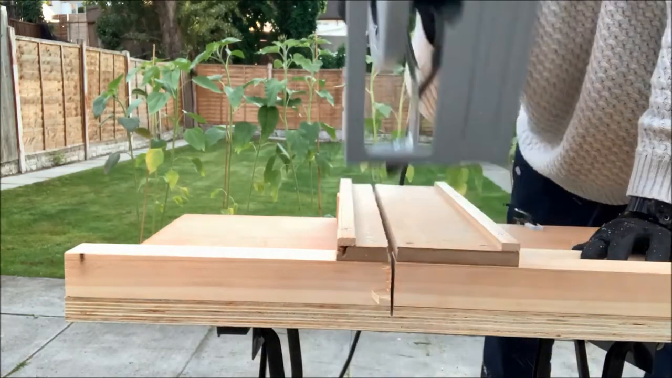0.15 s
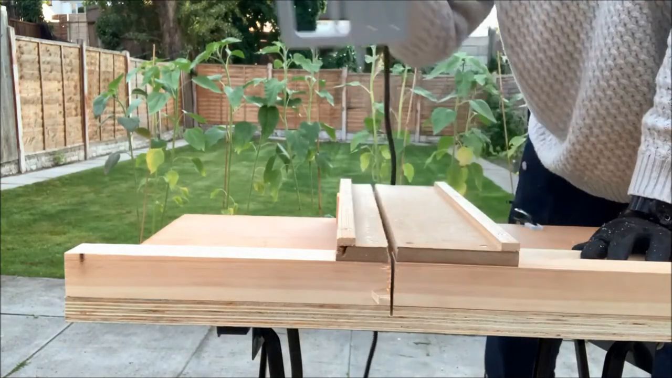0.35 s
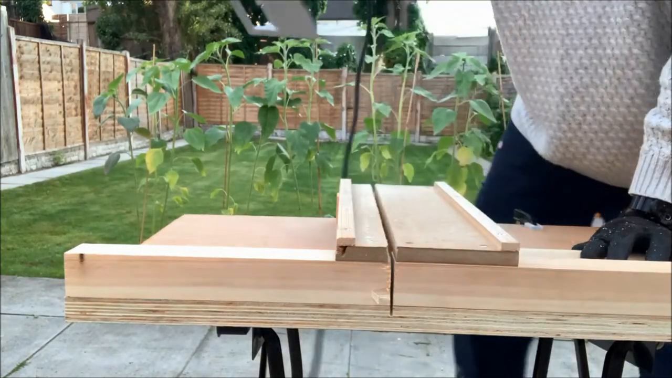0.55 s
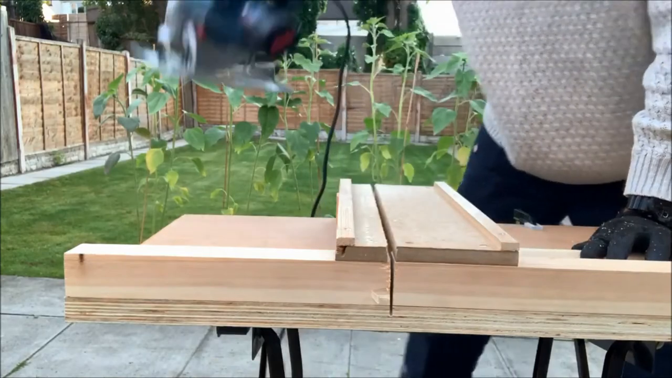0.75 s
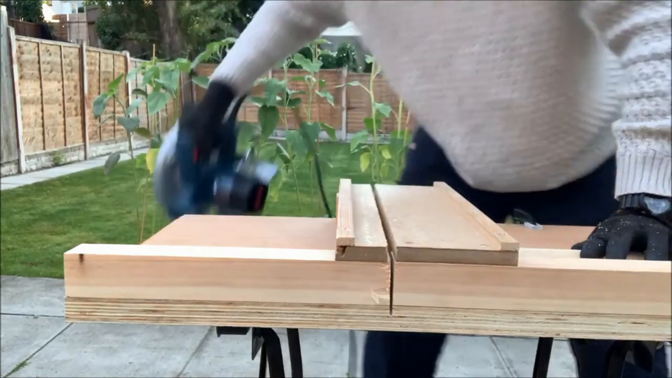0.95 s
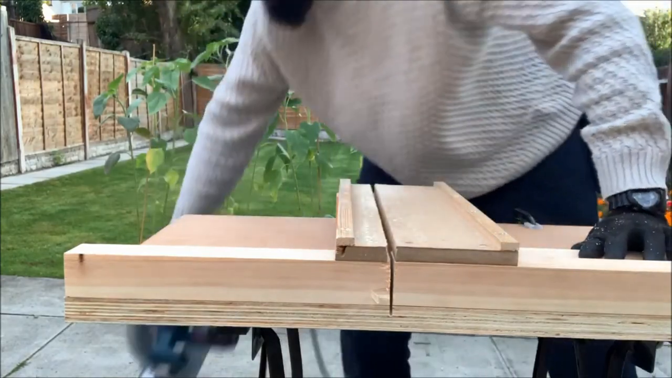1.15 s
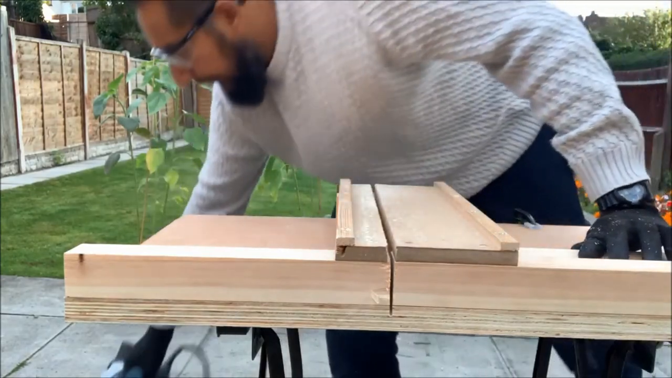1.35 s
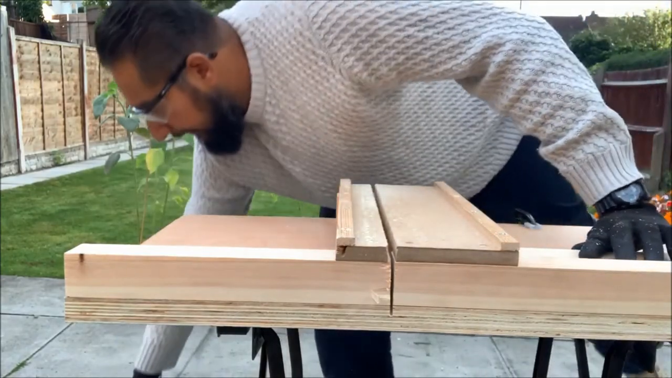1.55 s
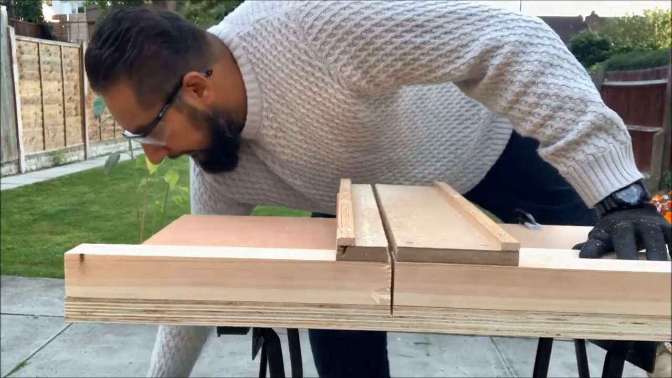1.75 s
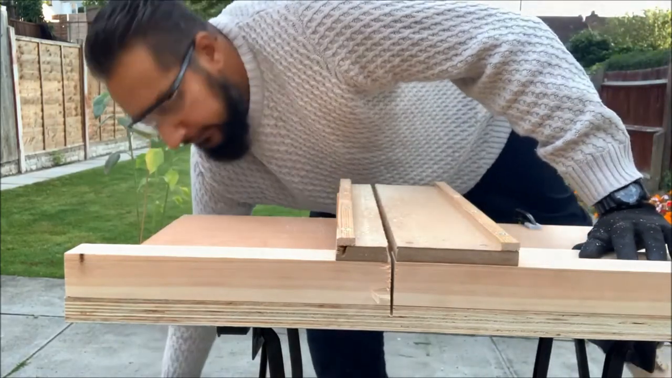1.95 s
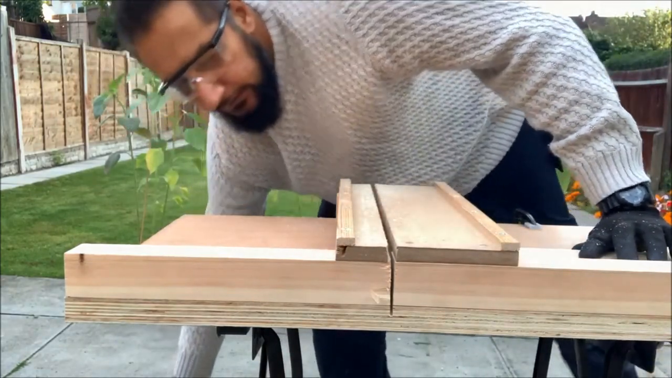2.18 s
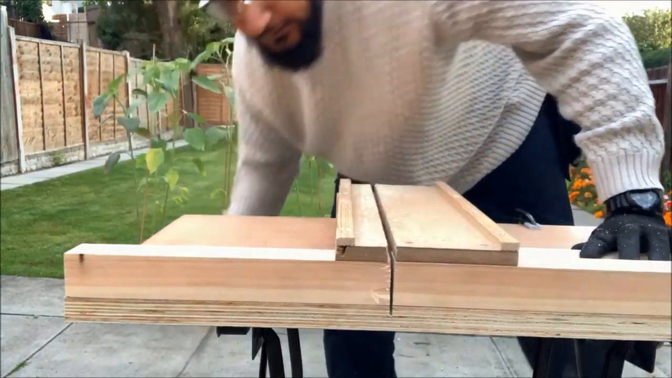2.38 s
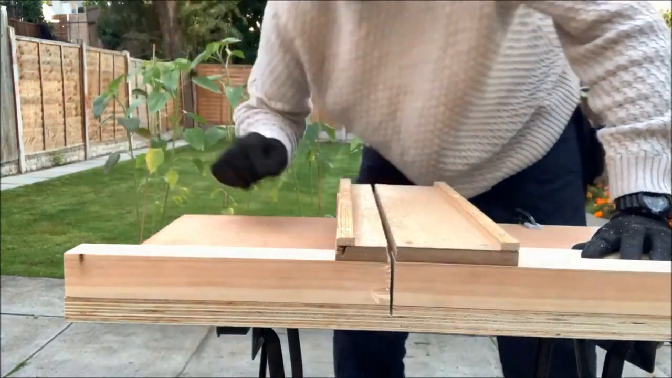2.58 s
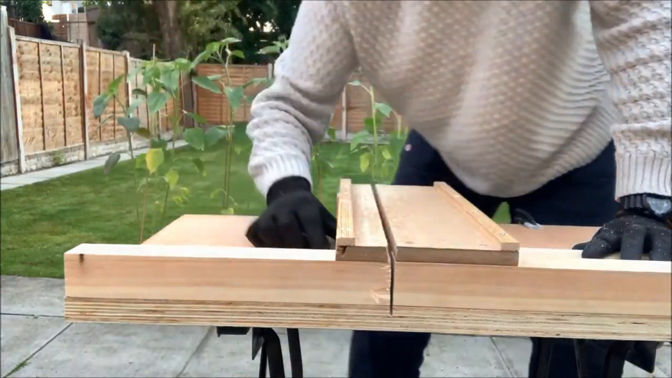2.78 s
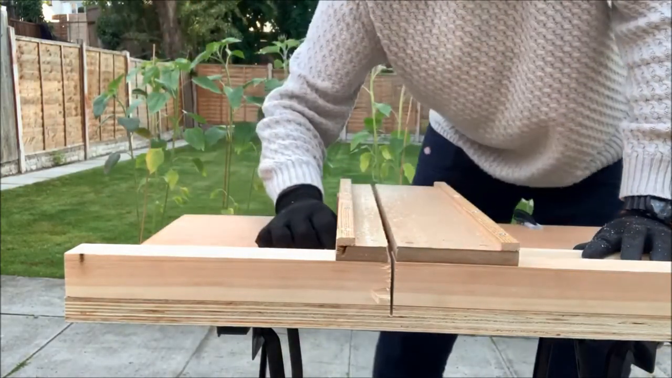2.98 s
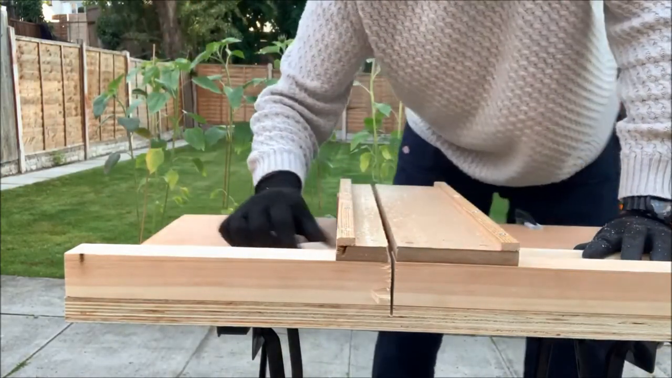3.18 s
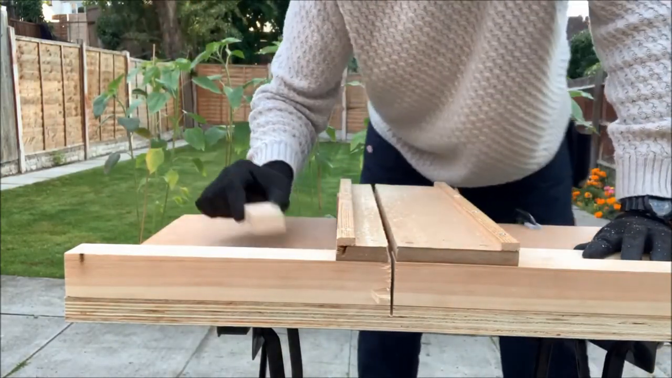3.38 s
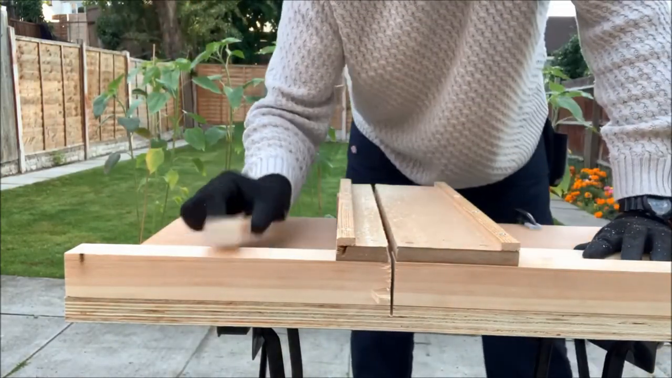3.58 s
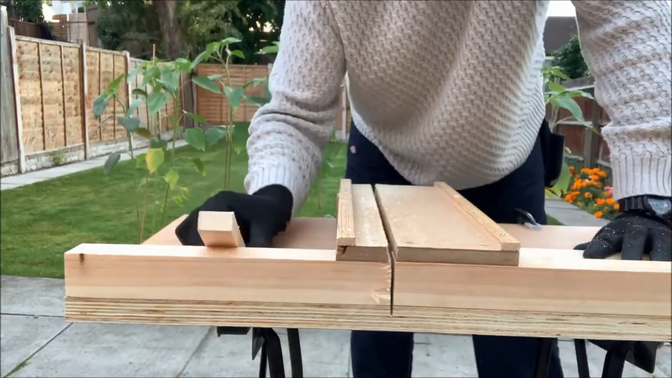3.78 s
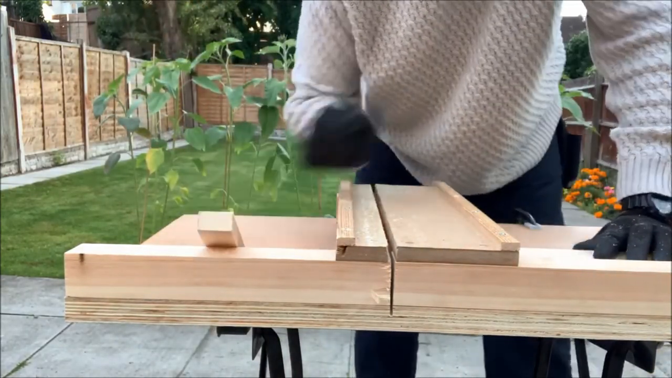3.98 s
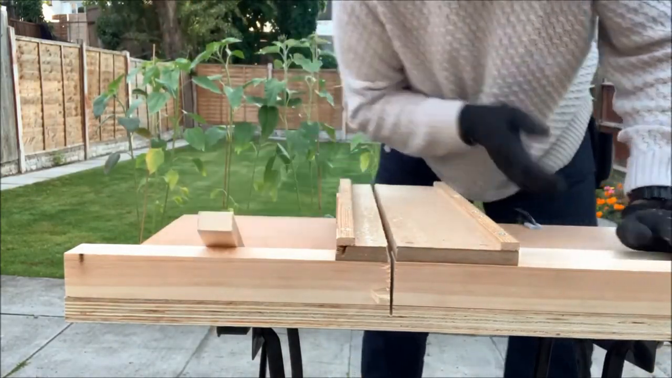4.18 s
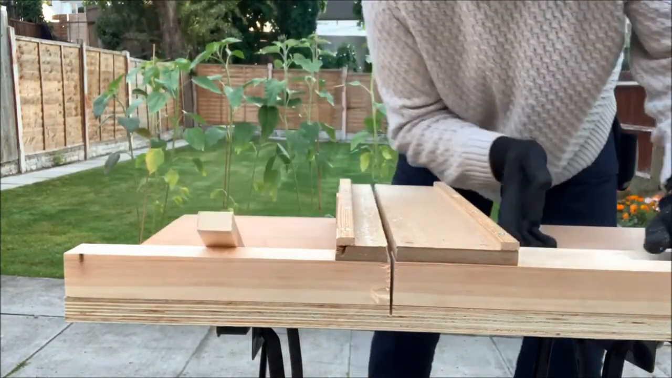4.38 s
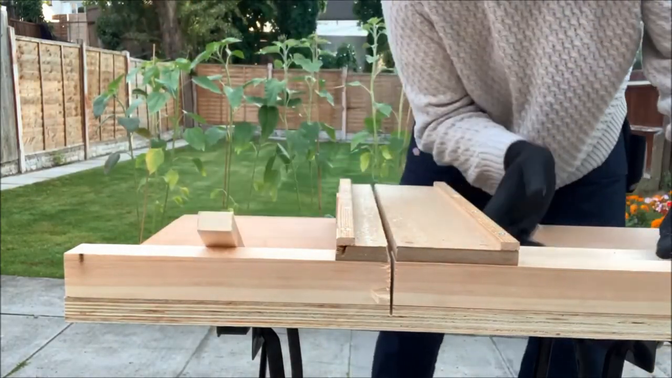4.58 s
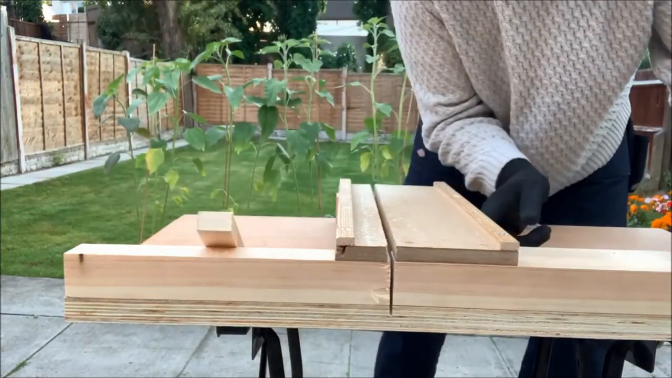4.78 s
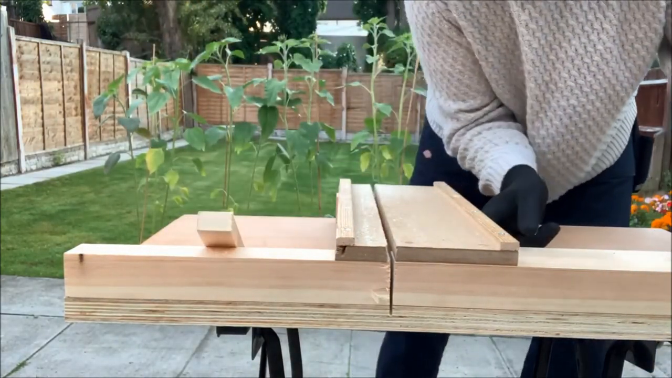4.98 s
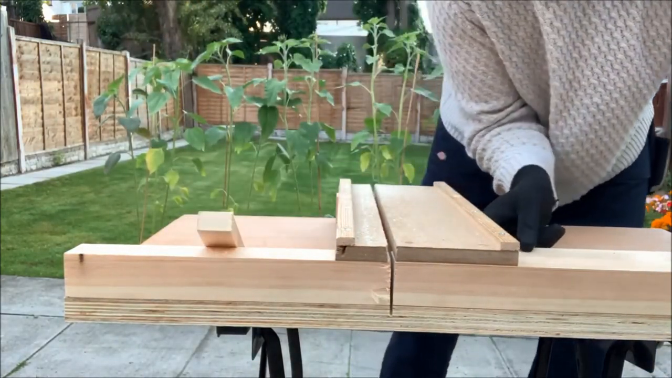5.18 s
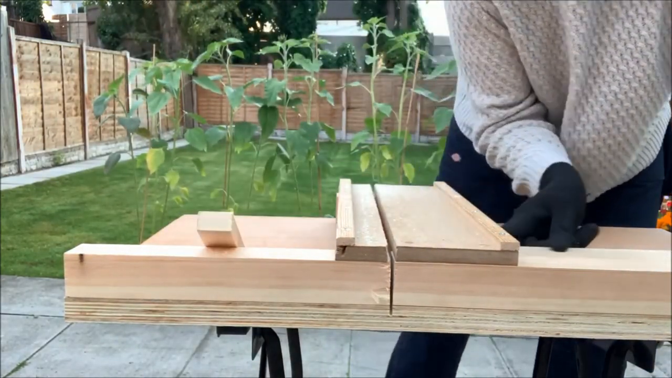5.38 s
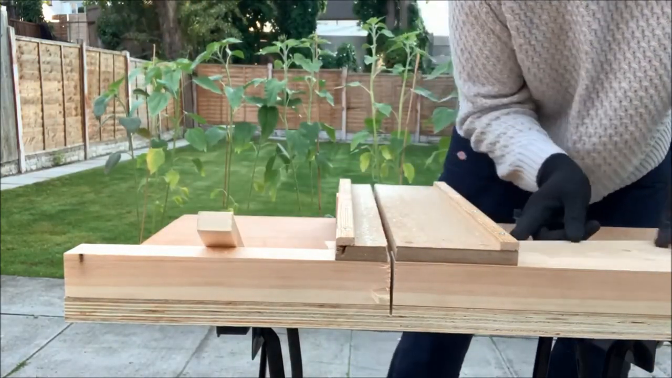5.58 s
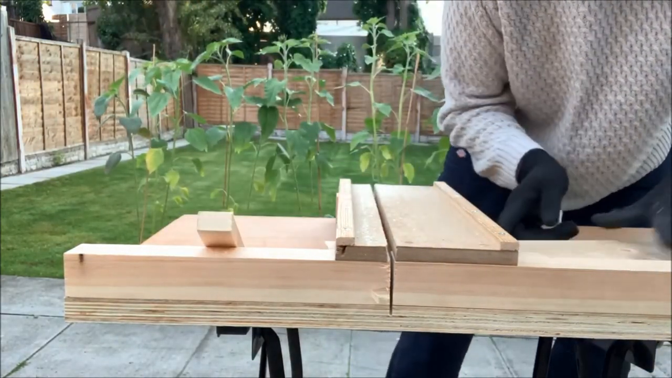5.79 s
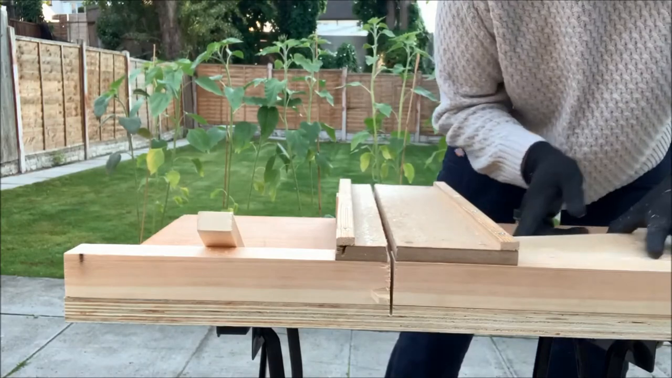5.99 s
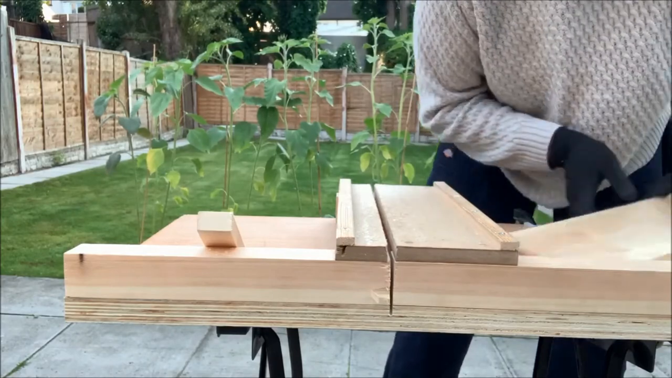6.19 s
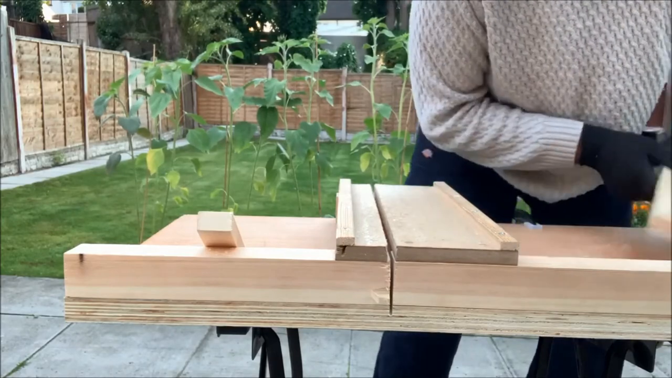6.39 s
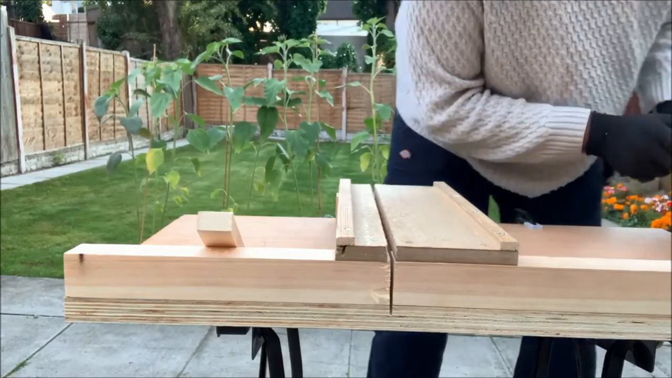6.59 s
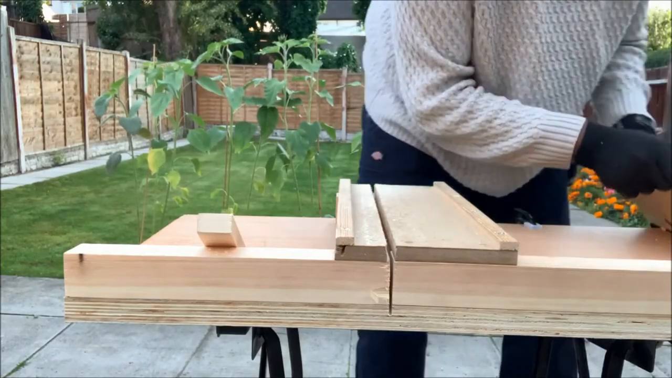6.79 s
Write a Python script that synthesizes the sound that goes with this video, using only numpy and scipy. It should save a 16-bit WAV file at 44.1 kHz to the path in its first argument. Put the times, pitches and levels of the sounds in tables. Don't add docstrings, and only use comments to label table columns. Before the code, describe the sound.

Circular saw coasting down in a garden, blade ringing on faintly, followed by paving knocks, soft glove scuffs, an offcut knock and a booming board drop.

```python
import sys
import numpy as np
from scipy import signal
from scipy.fft import irfft
from scipy.io import wavfile
from scipy.ndimage import uniform_filter1d

SR = 44100
rng = np.random.default_rng(int(sys.argv[2]) if len(sys.argv) > 2 else 0)


def invert_db(x):
    u = np.asarray(x, float) / 20
    return 10 ** u


def unload_wav(signal):
    wavfile.write(
        sys.argv[1],
        SR,
        np.round(np.clip(np.atleast_2d(signal).T, -1, 1) * 32767).astype(np.int16),
    )


N = 302085
T = np.arange(N) / SR


def evened(x):
    return x / np.sqrt(np.mean(abs(x) ** 2) + 1e-20)


def read(points, hz):
    f, value = np.transpose(points)
    return np.interp(np.log(hz + 1), np.log(f + 1), value)


def follow(rows):
    s, *columns = np.transpose(rows)
    return [np.interp(T, s, column) for column in columns]


def noise(colour, same, patchy_db):
    hz = np.fft.rfftfreq(512, 1 / SR)
    a, b, c, d, patches = rng.standard_normal((N // 128 + 5, 257, 5)).T
    patches = evened(uniform_filter1d(uniform_filter1d(patches, 6, 0), 14, 1))
    same = np.clip(same, 0, 1)
    left = a + 1j * b
    right = same * left + np.sqrt(1 - same ** 2) * (c + 1j * d)
    colour_db = np.where(hz < colour[-1][0], read(colour, hz), -90)
    z = np.array([left, right]) * invert_db(colour_db[:, None] + patchy_db * patches)
    return evened(signal.istft(z, nperseg=512, noverlap=384)[1][:, :N])


def waver(width_hz):
    z = rng.standard_normal((N, 2)) @ [1, 1j]
    r = np.exp(-np.pi * width_hz / SR)
    return evened(signal.lfilter([1], np.convolve([1, -r], [1, -r]), z))


def tone(hz, blur=1):
    turns = np.cumsum(hz * np.ones(N)) / SR + rng.random()
    return np.sqrt(2) * (blur * np.exp(2j * np.pi * turns)).real


def resonance(x, hz, width_hz):
    return signal.lfilter(*signal.iirpeak(hz, hz / width_hz, SR), x)


def moment(s, half_s):
    return np.exp(-((T - s) / half_s) ** 2)


def strokes(rows):
    power = 0
    for s, hold, db, *relative in rows:
        attack_db = 302 * np.maximum(s - T, 0)
        droop_db = 21 * np.clip(T - s, 0, hold)
        release_db = 164 * np.maximum(T - s - hold, 0)
        layers = invert_db(db + np.array([0, *relative]))
        power = power + np.outer(layers, invert_db(-attack_db - droop_db - release_db)) ** 2
    round_s = 0.014
    return np.sqrt(abs(uniform_filter1d(power, round(round_s * SR) + 1, axis=1)))


def knocks(rows, body, bounce_s, crack_s, rise_s, dull_hz):
    out, t = np.zeros(N + SR), np.arange(SR // 3) / SR
    dull = signal.butter(2, [250, dull_hz], "bandpass", fs=SR)
    for s, db, hz, t60, crack_db, body_db in rows:
        crack = rng.standard_normal(len(t)) * (np.exp(-t / crack_s) + 0.11 * np.exp(-t / 0.013))
        crack = signal.lfilter(*dull, crack + 1.1 * np.roll(crack, round(bounce_s * SR)))
        spot = np.sin(2 * np.pi * hz * t) * invert_db(-60 * t / t60)
        modes = 0
        detune = rng.uniform(0.95, 1.04, len(body))
        for (f, mode_db, ring), k in zip(body, detune):
            modes = modes + invert_db(mode_db - 60 * t / ring) * np.sin(2 * np.pi * f * k * t)
        rise = 1 - np.exp(-t / rise_s)
        blow = invert_db(crack_db + 1.5) * crack + spot + invert_db(body_db) * modes
        out[round(s * SR):][:len(t)] += invert_db(db) * rise * blow
    return out[:N]


# time_s [s], level_db [dB]
RUMBLE_LEVEL = [(0.0, -67.5), (0.52, -69.5), (0.61, -70), (0.74, -68), (0.86, -64), (1.03, -71),
                (1.55, -105), (1.73, -64.5), (2.23, -64), (2.4, -73.5), (4.3, -68), (4.45, -61.5),
                (4.9, -60.5), (5.06, -71), (5.17, -58), (5.86, -63.5), (5.99, -55.5), (6.7, -59)]
# pitch_hz [Hz], level_db [dB]
RUMBLE_COLOUR = [(15, -37.5), (30, -16), (55, -6), (90, -9), (150, -14.5), (300, -29.5)]
# pitch_hz [Hz], level_db [dB]
AIR_COLOUR = [(100, -0.5), (250, 0), (600, -4.5), (1500, -6.5), (3000, -17), (6000, -29.5), (9000, -25.5),
              (15000, -39.5), (16300, -31)]


def garden():
    level_db = follow(RUMBLE_LEVEL)[0]
    hum = np.clip((level_db + 85) / 35, 0, 1)
    rumble = (1 - hum) * noise(RUMBLE_COLOUR, .7, 1.)
    rumble = rumble + hum * tone(60, .8 + .45 * waver(9.))
    return invert_db(level_db) * rumble + invert_db(-77) * noise(AIR_COLOUR, 0.055, 0.53)


# pitch_hz [Hz], t60 [s]
YARD_DECAY = [(150, 0.36), (1000, 0.25), (2000, 0.45), (4000, 0.042), (9000, 0.19)]


def yard(x):
    taps = np.zeros((2, SR // 2))
    at = np.arange(500, SR // 2 - 20, 20)
    at = at + rng.integers(0, 20, (2, len(at)))
    np.put_along_axis(taps, at, rng.choice([-1., 1.], at.shape), 1)
    hz, t, z = signal.stft(taps, SR, nperseg=256)
    decay = invert_db(-60 * t / read(YARD_DECAY, hz)[:, None])
    tail = signal.istft(z * decay, SR, nperseg=256)[1]
    return signal.fftconvolve(x[None], tail / np.linalg.norm(tail[0]), axes=1)[:, :N]


# start_s [s], level_db [dB], pitch_hz [Hz]
THUMPS = [(0.612, -40.5, 69.4), (1.177, -57, 59.7), (3.73, -43, 300), (3.691, -45, 170),
          (0.795, -46.5, 174), (0.843, -42, 49.4), (1.682, -45.5, 140), (1.74, -43, 125), (1.8, -46, 118),
          (1.912, -48, 127), (2.186, -35, 157), (2.563, -36.5, 261), (2.567, -41.5, 143), (2.58, -49, 192),
          (3.328, -50.5, 52), (3.622, -25, 316), (3.638, -42, 175), (3.677, -42, 215), (3.707, -40, 495),
          (4.338, -48, 170)]


def thumps():
    rows = [(s, db, hz, 0.042 * np.sqrt(100 / hz), -35.5, -32) for s, db, hz in THUMPS]
    return knocks(rows, PANEL_MODES, 0.0016, .003, 0.0025, 1500.)


# start_s [s], level_db [dB], pitch_hz [Hz], t60 [s], body_db [dB]
SHIVERS = [
    (3.64, -60, 978, 1, 5),
    (3.69, -67, 1960, 0.4, 1),
    (6.12, -54, 1245, 0.3, -12),
    (6.149, -56.5, 2300, 0.18, -13),
]
# pitch_hz [Hz], level_db [dB], t60 [s]
TRESTLE_MODES = [(1030, -14, 0.8), (1120, -5.5, 0.92), (1530, 4, 0.25), (1934, -1, 0.53), (2300, -9, 0.23),
                 (3180, -16, 0.46), (3753, 3.5, 0.73), (4970, -11, 0.69)]


def trestle():
    rows = [(s, db, hz, t60, -35.5, body) for s, db, hz, t60, body in SHIVERS]
    return knocks(rows, TRESTLE_MODES, .0025, .003, 0.014, 1500.) * waver(160.0).real


# start_s [s], hold [s], rub_db [dB], scuff_db [dB re
# rub], fizz_db [dB re rub]
RUBS = [(2.78, 0.12, -67.5, -12, -1.5), (2.98, 0.058, -80, 7, -4.5), (3.14, 0.086, -77.5, 6, 0),
        (3.23, 0.01, -73, 4.5, -6.5), (3.54, 0.085, -81, 3.5, -10), (3.66, 0.058, -71, 8.5, -33),
        (4.13, 0.6, -77, 2, -4.5), (4.37, 0.07, -70.5, -4, -7.5), (4.59, 0.17, -76.5, -2, -5.5),
        (4.76, 0.015, -86.5, -3.5, -12.5), (4.84, 0.34, -82, 6.5, -6.5), (5.21, 0.081, -78.5, 4.5, -4.5),
        (5.385, 0.058, -64, -19, -10), (5.44, 0.018, -55, -5, -9.5), (5.51, 0.013, -75.5, 15, -9),
        (5.59, 0.57, -85.5, 11.5, -4), (5.91, 0.04, -68.5, 0, -14), (5.98, 0.193, -63, 1.5, -11.5),
        (6.2, 0.11, -72, 4, -15.5), (6.4, 0.16, -88, 21.5, -9), (6.6, 0.16, -77, 6.5, -3.5),
        (6.735, .05, -66, 9.5, -4)]
# pitch_hz [Hz], level_db [dB per Hz]
RUB_COLOUR = [(800, -15.5), (1500, 0), (2500, -6), (4000, -2), (6000, -14.5), (8000, -19), (10000, -49)]
SCUFF_COLOUR = [(100, -53), (200, 5.5), (500, -2), (1100, -5.5), (1800, -24)]
SWISH_COLOUR = [(3500, -8.5), (5500, 11.5), (7500, -1), (9500, 11), (12000, 1), (15000, 5.5), (16300, -3.5)]


def gloves():
    rub, scuff, fizz = strokes(RUBS)
    grain = invert_db(0.44 * evened(uniform_filter1d(rng.standard_normal(N), 90)))
    snags = (rng.random(N) < 160 / SR) * rng.exponential(.35, N)
    grain = evened(grain) + signal.lfilter([1], [1, -.985], snags)
    mix = rub * noise(RUB_COLOUR, 0.045, 3.0)
    mix = mix + scuff * noise(SCUFF_COLOUR, 0.74, 2.65)
    mix = mix + invert_db(0.5) * fizz * noise(SWISH_COLOUR, 0.75, 1.9)
    return evened(grain) * mix


# start_s [s], level_db [dB], decay [s], lowest_hz [Hz]
TICKS = [
    (.1056, -24, .002, 9380),
    (.1075, -23.5, .002, 6000),
    (1.675, -39.5, .002, 8000),
    (3.6155, -39, 0.0012, 6880),
    (6.7195, -48, .003, 2500),
    (6.7235, -47, .003, 2505),
    (6.779, -50.5, .003, 6000),
    (6.789, -51.5, .004, 6000),
]


def ticks():
    out, t = np.zeros((2, N + SR)), np.arange(SR // 20) / SR
    same = .7
    for s, db, decay_s, low_hz in TICKS:
        a, b = rng.standard_normal((2, len(t))) * np.exp(-t / decay_s)
        burst = np.array([a, same * a + np.sqrt(1 - same ** 2) * b])
        bright = signal.lfilter(*signal.butter(2, low_hz, "highpass", fs=SR), burst)
        out[:, round(s * SR):][:, :len(t)] += invert_db(db) * bright
    return out[:, :N]


# start_s [s], level_db [dB], pitch_hz [Hz], hardness_db [dB]
BLOCK_HITS = [(2.562, -48.5, 594, -29.5), (3.002, -57.5, 830, -18), (3.6147, -43, 710, 3.5),
              (3.704, -40.5, 1030, -35), (3.706, -59, 650, -34), (5.841, -50.5, 202, -34),
              (5.871, -50.5, 290, -29), (5.929, -56.5, 420, -15), (5.976, -52, 1500, -30),
              (6.005, -51, 3450, -21), (6.011, -53.5, 1240, -12), (6.028, -52, 445, -30),
              (6.059, -44, 300, -24), (6.063, -48, 2410, -20), (6.068, -39, 190, -29.5),
              (6.076, -48, 1206, -31), (6.106, -35.5, 1215, -24.5), (6.108, -45.5, 1920, -20),
              (6.114, -42.5, 260, -25), (6.133, -44.5, 1110, -31), (6.162, -49.5, 1310, -28),
              (6.186, -50, 1156, -32)]
# pitch_hz [Hz], level_db [dB], t60 [s]
BLOCK_MODES = [(175, -20, .09), (560, -9, .04), (800, -2, .03), (930, -12, .04), (1260, -4, .03),
               (1600, -5, .025), (1980, -3, .03), (2300, -5, .02), (2800, -8, .015), (3500, -8, .014),
               (4600, -8, .013), (5800, -12, .011), (7700, -14, .01)]


def offcut():
    rows = [(s, db, hz, 0.035, hard, 13 + 0.98 * hard) for s, db, hz, hard in BLOCK_HITS]
    return knocks(rows, BLOCK_MODES, 0.0023, 0.00056, 0.00072, 11000.0)


# start_s [s], level_db [dB], pitch_hz [Hz], t60 [s], body_db [dB]
PANEL_HITS = [
    (6.722, -24, 456, 0.031, -3),
    (6.7242, -26.5, 204, 0.073, 4),
    (6.728, -28, 136.3, 0.16, 3),
    (6.745, -26, 236, 0.03, -1.5),
    (6.756, -32.5, 151, 0.081, -0.5),
    (6.767, -31, 254, 0.038, -7),
    (6.781, -40, 178, 0.056, -11.5),
    (6.805, -41.5, 263, 0.025, -14),
    (6.84, -51, 226, 0.05, -2),
]
# pitch_hz [Hz], level_db [dB], t60 [s]
PANEL_MODES = [(127, -10, 0.2), (181, -9, 0.14), (255, -11, .07), (334, -8, 0.06), (518, -13, 0.045),
               (785, -7, 0.03), (1285, -13, 0.04), (1750, -23, .04), (2010, -28, 0.1)]


def panel():
    rows = [(s, db, hz, t60, -11, body) for s, db, hz, t60, body in PANEL_HITS]
    return knocks(rows, PANEL_MODES, 0.0017, 0.0088, 0.0031, 3400.0)


# start_s [s], level_db [dB], pitch_hz [Hz], crack_db [dB], body_db [dB]
SHOE_HITS = [(.107, -28.5, 2165, -5, -12), (0.1138, -34, 1424, -4.5, -15), (0.1182, -33, 1620, -8.5, 4),
             (1.65, -34.5, 3060, -10.5, 1.5), (1.657, -40, 2300, -4.5, -3.5), (1.669, -33, 2900, -6.5, 2),
             (1.674, -23.5, 2163, -12, -14.5), (1.726, -43.5, 1940, 1, -19), (1.753, -52, 9400, -2, -23),
             (1.973, -62, 6600, 0.5, 8), (2.074, -45, 1520, -11.5, -12), (2.138, -55.5, 7200, -4, -26),
             (2.188, -38, 1210, -14.5, -7.5), (2.205, -47.5, 1626, -5.5, -23)]
# pitch_hz [Hz], level_db [dB], t60 [s]
SHOE_MODES = [(180, -26, .07), (700, -16, .04), (1200, -5, .04), (2164, -4, .04), (2450, -6, .04),
              (2900, -5, .05), (3451, -8, .04), (4797, -11, .03), (7300, -14, .03), (9200, -13, .06)]


def shoe():
    rows = [(s, db, hz, 0.068, crack, body) for s, db, hz, crack, body in SHOE_HITS]
    return knocks(rows, SHOE_MODES, 0.00094, 0.0096, 0.00025, 9600.0)


# time_s [s], speed [turns per s]
BLADE_SPEED = [(0, 46.8), (.3, 39.4), (.62, 32.0), (.85, 26.55), (1.07, 21.7), (1.62, 11), (1.8, 7.4),
               (1.95, 5.1), (2.05, 3.9), (2.14, 2.3), (2.22, 0)]


def blade_speed():
    return follow(BLADE_SPEED)[0]


# time_s [s], level_db [dB]
SAW_LEVEL = [(0.0, -36.5), (0.46, -43), (0.7, -45), (1.07, -50.5), (1.34, -48), (1.62, -50.5), (1.83, -59),
             (2.1, -72), (2.45, -76)]


def saw_level():
    return follow(SAW_LEVEL)[0]


# time_s [s], four_node_db [dB], five_node_db [dB]
RINGING = [(0, -64, -43), (.3, -46, -47.5), (.6, -91, -54), (0.849, -63, -56), (1.1, -51.5, -59),
           (1.15, -70, -74), (1.185, -39.5, -60), (1.22, -76, -56), (1.25, -50, -52), (1.29, -61, -59),
           (1.4, -65, -56.5), (1.9, -52.5, -62.5), (2.15, -54, -64)]
# level_db [dB], fade [dB per s], first_silence_s [s], beat_s [s]
RESTING = [
    (-59, 3.5, 2.953, 1.855),
    (-64.5, 4, 2.18, 1.064),
]


def main_rings():
    rest_s, settle_s, damp_s = 2.09, 0.26, 6.4
    rest = np.clip((T - rest_s) / settle_s, 0, 1)
    damped_db = -1.5 * np.clip((T - damp_s) / 0.034, 0, 1) - 14 * np.maximum(T - damp_s, 0)
    gains = []
    for shaken_db, (db, fade_db, silence_s, beat_s) in zip(follow(RINGING), RESTING):
        beat = abs(1 - np.exp(2j * np.pi * (T - silence_s) / beat_s)) / 2
        free = beat * invert_db(db - fade_db * (T - rest_s) + damped_db)
        gains.append((1 - rest) * invert_db(shaken_db) + rest * free)
    return gains


# pitch_hz [Hz], nodal_lines [count]
MAIN_MODES = [(1254, 4), (1733, 5)]
# pitch_hz [Hz], nodal_lines [count], driven_db [dB re hiss], free_db [dB], t60 [s]
MINOR_MODES = [(829, 3, -32, -85, 40), (2519, 6, -26, -87, 20), (3451, 8, -20, -74, 10),
               (3512, 6, -5, -110, 2), (3727, 7, -22, -75, 14), (5545, 9, -22, -90, 10)]


def blade():
    speed = blade_speed()
    backward = 0.15 + 0.69 * np.exp(-speed / 12)
    driven = invert_db(saw_level()) * np.clip(speed / 45.0, 0, 1)
    gains = main_rings()
    for _, _, db, free_db, t60 in MINOR_MODES:
        gains.append(driven * invert_db(db) + invert_db(free_db - 60 * T / t60))
    out = np.zeros(N)
    for (hz, nodes, *_), gain in zip(MAIN_MODES + MINOR_MODES, gains):
        centre = hz + 0.003852 * speed ** 2
        spun = np.cumsum(nodes * speed) / SR
        forward = np.exp(2j * np.pi * (spun - spun[-1]))
        waves = (forward + backward / forward) / (1 + backward * (speed < 12))
        shimmer = 1 + .6 * np.clip(speed / 30, 0, 1) * (waver(16.) - .3)
        out += gain * tone(centre, shimmer * waves)
    return out


def comb(turns):
    spread_db = 2.5 * np.minimum(rng.exponential(1, (3, 513)), 2)
    z = invert_db(spread_db) * np.exp(2j * np.pi * rng.random((3, 513)))
    z[:, 92:] = 0
    place = np.arange(1025) / 1024
    out = 0
    for w in irfft(z, axis=1):
        out = out + np.interp(turns % 1, place, np.append(w, w[0])) * (.8 + .6 * waver(14.).real)
    return evened(signal.lfilter(*signal.butter(2, [1500, 8000], "bandpass", fs=SR), out))


# order [multiple of armature speed], level_db [dB re hiss]
ORDERS = [(2, -24), (7, -27), (10, -27), (14, -23), (20, -25), (24, -21), (33, -25), (42, -24), (48, -21),
          (60, -22), (72, -19), (84, -21), (96, -21)]
# time_s [s], whine_db [dB]
FACING = [(0, -2), (.3, -1), (.55, -1), (.7, 0), (.8, -1), (.92, -1), (1.05, -1), (1.35, 0), (1.6, -2)]
# order [multiple], centre_s [s], half_length [s], level_db [dB re hiss]
FLARES = [(1, .08, .1, -15), (2, .15, .1, -14), (3, .12, .1, -15), (3, .3, .08, -14), (4, .43, .09, -11),
          (4, .55, .04, -15), (5, .25, .12, -14), (6, .04, .06, -13), (7, .16, .06, -13), (7, .3, .07, -13),
          (24, .38, .05, -3), (13, .5, .06, -13), (20, .61, .04, -8), (24, .69, .09, -5),
          (24, .59, .025, -8), (22, .69, .03, -14), (37, .69, .015, -6), (33, .73, .018, -5),
          (34, .74, .03, -13), (24, .8, .04, -7), (48, .76, .07, -9), (48, .88, .04, -13),
          (96, .83, .08, -4), (24, .91, .025, -3), (29, .875, .015, -6), (7, .8, .1, -16),
          (4, .84, .04, -15), (24, 1.01, .022, 0), (24, 1.075, .03, -2), (33, 1.1, .015, -6),
          (35, 1.095, .012, -6), (7, 1.12, .07, -20), (15, 1.19, .02, -5), (16, 1.25, .02, -8),
          (24, 1.2, .05, -13), (37, 1.17, .03, -9), (42, 1.26, .015, -9), (72, 1.31, .025, -11),
          (48, 1.43, .04, -10), (7, 1.48, .04, -20), (33, 1.55, .05, -11), (72, .7, .08, -10),
          (84, .66, .06, -10)]
# pitch_hz [Hz], width_hz [Hz], level_db [dB]
BOOMS = [(1340, 70, 12), (4650, 150, 5), (5350, 200, 5)]


def orders(speed):
    armature = 4.79 * speed
    turns = np.cumsum(armature) / SR
    lines = 0
    for k, db in ORDERS:
        lines = lines + invert_db(db) * tone(k * armature, (.65 + .5 * waver(30.)) * (.9 + .2 * waver(6.)))
    lines = lines * (1 + .7 * np.cos(2 * np.pi * turns))
    lines += invert_db(-11.5 + follow(FACING)[0]) * comb(turns)
    blur = .85 + .42 * waver(45.)
    for k, s, half_s, db in FLARES:
        lines += invert_db(db) * moment(s, half_s) * tone(k * armature, np.roll(blur, k * SR // 10))
    lines = lines + sum(invert_db(db) * resonance(lines, hz, width) for hz, width, db in BOOMS)
    lines *= np.clip((speed - 6) / 13, 0, 1)
    return signal.lfilter(*signal.butter(4, 13500, fs=SR), lines)


# pitch_hz [Hz], width_hz [Hz], level_db [dB]
HOUSING_MODES = [(1357, 180, -3.5), (594, 110, 4.5), (2550, 290, 5.5), (3040, 1100, 4.5), (3490, 460, 4.5),
                 (4800, 980, -13.5), (5800, 1000, 2.5)]
# pitch_hz [Hz], width_hz [Hz], centre_s [s], half_length [s], level_db [dB re hiss]
BUZZES = [
    (1350, 120, 0.21, 0.093, 4),
    (5570, 250, .21, .07, 5),
    (3510, 300, .4, .12, 3),
    (3000, 200, 0.18, .08, 4),
    (2300, 150, .52, .06, 3.5),
    (3420, 150, 1.128, 0.039, -5),
    (3450, 300, 1.305, 0.034, -1.5),
    (1290, 59, 1.234, 0.052, -2.5),
    (4000, 250, 0.34, .08, 6),
    (5100, 900, .72, 0.057, -3),
]


def housing(x):
    core = evened(x + sum(invert_db(db) * resonance(x, hz, width) for hz, width, db in HOUSING_MODES))
    buzz = 0
    for hz, width, s, half_s, db in BUZZES:
        buzz = buzz + invert_db(db) * moment(s, half_s) * resonance(core, hz, width)
    return core + buzz


# pitch_hz [Hz], level_db [dB per Hz]
HISS_COLOUR = [(500, -24.5), (1000, 2.5), (1400, 7.5), (2500, -3), (4000, 0.5), (6000, -6), (8000, -4.5),
               (10000, -56)]
ROAR_COLOUR = [(100, -26), (250, -8), (500, 2.5), (900, 3.5), (1500, -24.5)]
FIZZ_COLOUR = [(5000, -24.5), (7500, 8.5), (9000, 3.5), (11000, 8), (13000, 3.5), (14800, 1.5),
               (15400, -10.5), (16000, -31.5)]
# start_s [s], hold [s], level_db [dB], roar_db [dB re level], fizz_db [dB re level]
DRAGS = [
    (1.665, 0.039, -43, -15.5, -34),
    (1.8, 0.2, -61.5, -6.5, -41),
    (2.07, 0.0068, -63.5, 5.5, -21),
    (2.19, 0.017, -56.5, -5.5, -12.5),
    (2.27, 0.055, -62.5, -29.5, -21),
]
# start_s [s], hold [s], fizz_db [dB]
VENTS = [
    (.74, 0.18, -53),
]


def motor():
    speed = blade_speed()
    level_db = saw_level()
    core = housing(noise(HISS_COLOUR, .7, 2.3) + orders(speed))
    slowed_db = 20 * np.log10(np.maximum(speed, 9.) / speed[0])
    drag = strokes(DRAGS)
    hiss = np.hypot(invert_db(level_db), drag[0])
    roar = np.hypot(invert_db(level_db - 8.5 + 2 * slowed_db), drag[1])
    fizz = np.hypot(invert_db(level_db - 10 + 0.92 * slowed_db), drag[2] + strokes(VENTS)[0])
    mix = hiss * core + roar * noise(ROAR_COLOUR, 0.65, 2.2)
    mix = mix + invert_db(3.5) * fizz * noise(FIZZ_COLOUR, .9, 1.8)
    return np.clip((2.6 - T) / 0.61, 0, 1) * mix


def scene():
    hits = shoe() + offcut() + panel() + thumps()
    echoes = yard(invert_db(-16) * hits + trestle())
    return garden() + echoes + gloves() + ticks() + hits + blade() + motor()


# time_s [s], side [+ right, - left]
SIDE_OF = [(0, 0.4), (.7, 0.018), (1.65, -0.16), (2.3, -0.16), (2.7, 0.18), (3.7, 0.096), (4.3, 0.27),
           (5.3, 0.37), (6.85, 0.35)]
# pitch_hz [Hz], phase [rad per unit side]
PATH_PHASE = [(60, -1.2), (345, 3), (1700, 4), (2400, 7), (4100, 14), (6000, 6), (8000, 0)]
# pitch_hz [Hz], phase [rad]
PORT_PHASE = [(5000, 0), (7200, -2.3), (8300, -2.95), (9300, -3.15), (10300, -3.95), (11700, -5),
              (13100, -6.15), (14500, -6.28)]
# pitch_hz [Hz], side_gain [ratio]
WIDTH = [(60, 1), (500, 1), (5000, 1), (7500, 1), (9200, 0.6), (11000, 0.87), (14000, .3)]
# pitch_hz [Hz], lean_db [dB left over right]
LEAN = [(60, 5.5), (350, 2.5), (900, 0.5), (1700, -2), (5000, -2.5), (8000, 2)]


def microphone(dry):
    hz, t, (left, right) = signal.stft(dry, SR, nperseg=256, noverlap=192)
    mid = (left + right) / 2
    side = (left - right) / 2 * read(WIDTH, hz)[:, None]
    bearing = np.interp(t, *np.transpose(SIDE_OF))
    turn = read(PORT_PHASE, hz)[:, None] + np.outer(read(PATH_PHASE, hz), bearing)
    half = np.exp(.5j * turn) / invert_db(read(LEAN, hz)[:, None] / 2)
    pair = np.array([(mid + side) / half, (mid - side) * half])
    pair = signal.istft(pair, SR, nperseg=256, noverlap=192)[1]
    bass_cut = signal.butter(2, 38., "highpass", fs=SR, output="sos")
    band_limit = signal.cheby2(10, 60, 16700, fs=SR, output="sos")
    return signal.sosfilt(band_limit, signal.sosfilt(bass_cut, pair))[:, :N]


def roll_off(x):
    return signal.sosfilt(signal.butter(12, 15800, fs=SR, output="sos"), x)


def record(dry):
    mix = microphone(dry)
    return roll_off(mix)


dry = scene()
out = record(dry)
unload_wav(out)
```